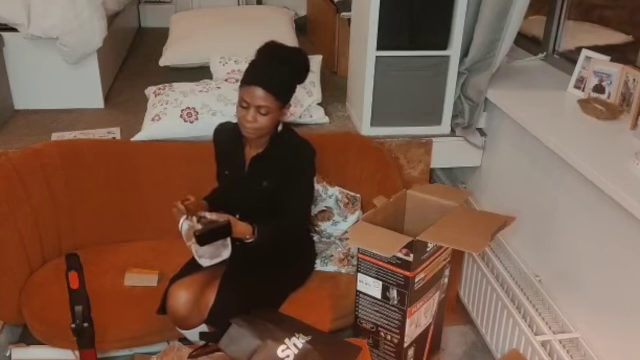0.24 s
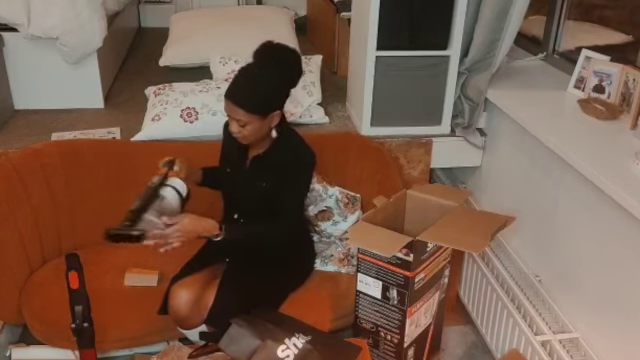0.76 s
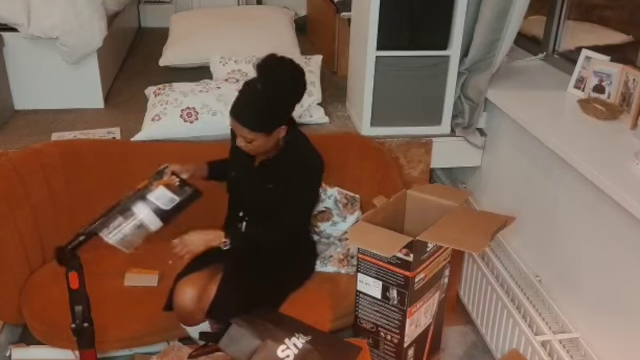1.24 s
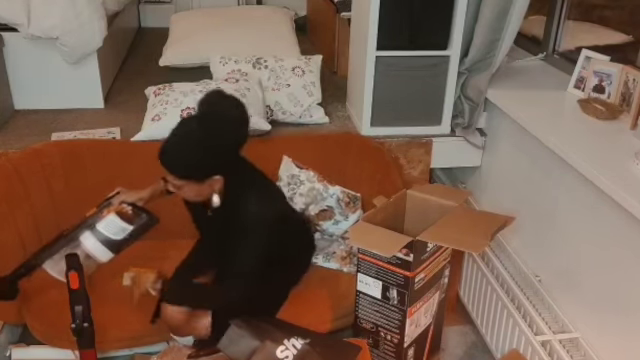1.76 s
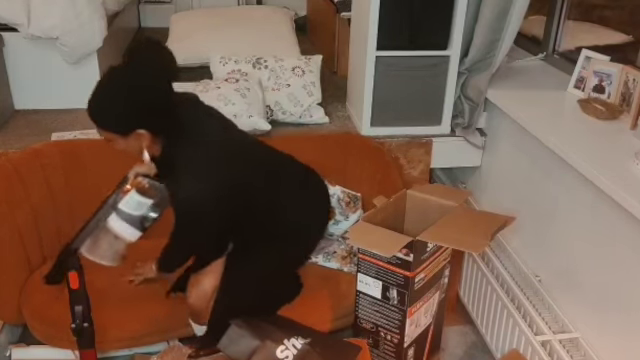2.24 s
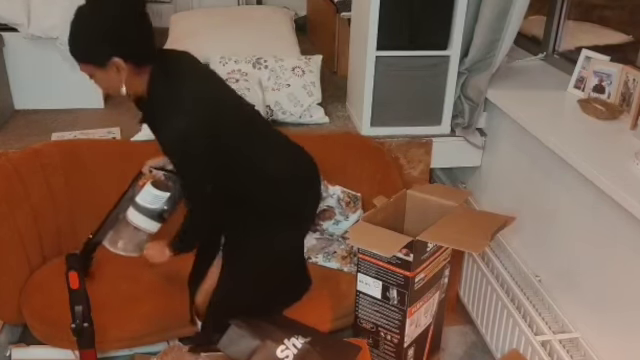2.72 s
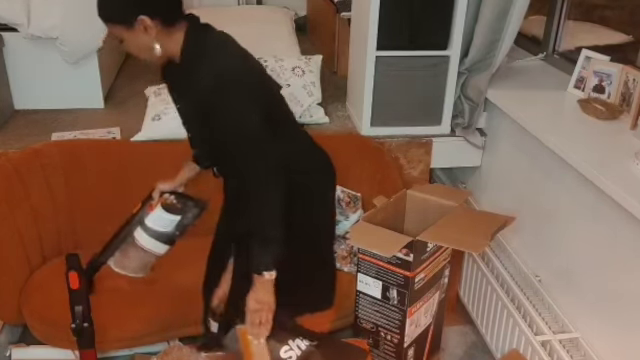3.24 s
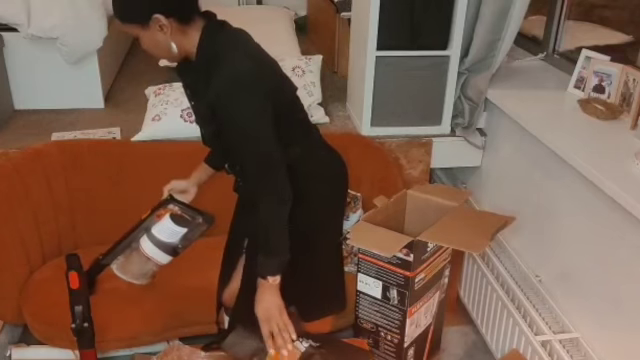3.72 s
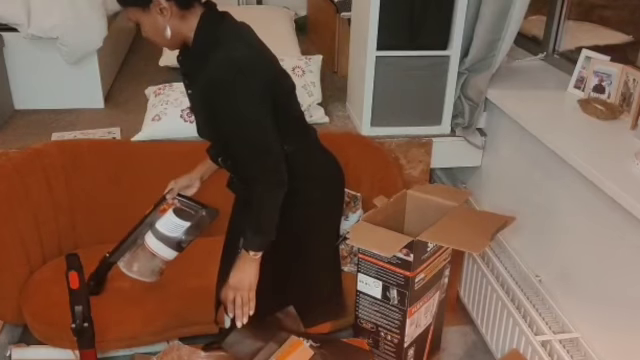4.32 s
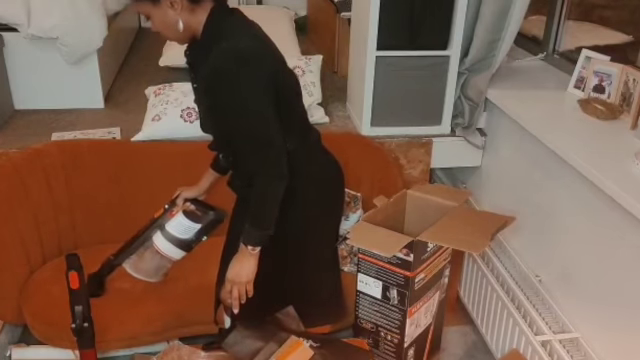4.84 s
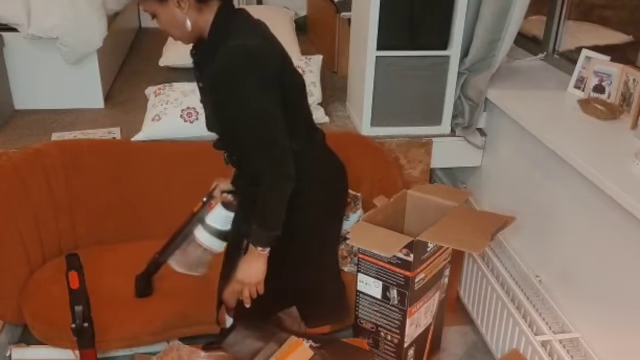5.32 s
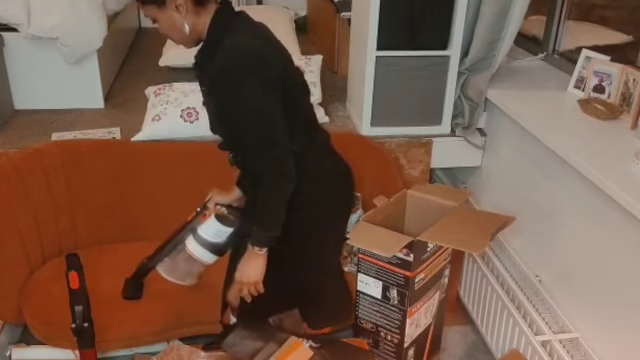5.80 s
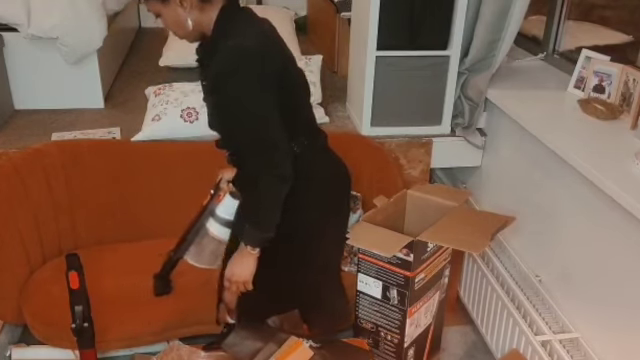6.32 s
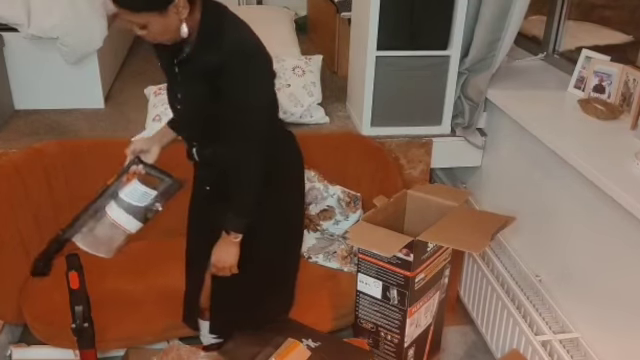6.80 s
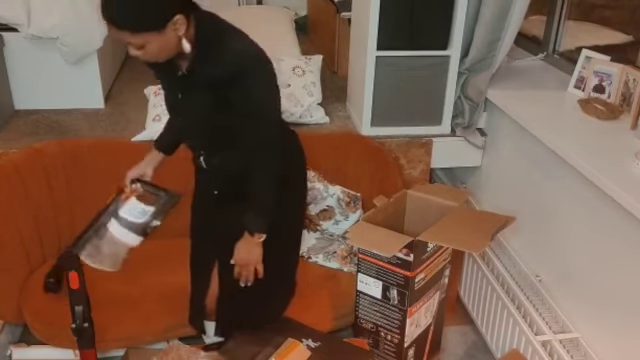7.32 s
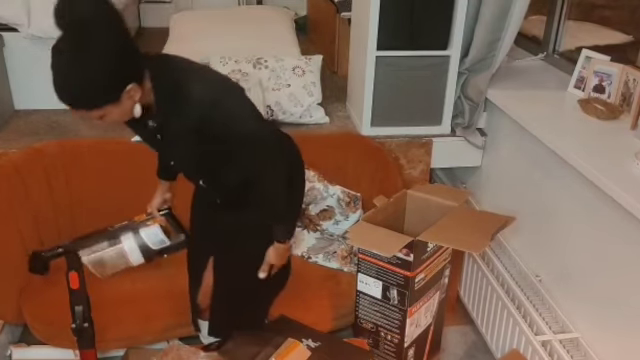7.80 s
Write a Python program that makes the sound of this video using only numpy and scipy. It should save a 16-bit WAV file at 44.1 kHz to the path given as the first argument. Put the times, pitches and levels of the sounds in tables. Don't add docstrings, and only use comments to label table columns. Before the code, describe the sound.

In a furnished room, a sharp plastic snap rings briefly, then near quiet with faint cloth movement. A sleeve swishes and a knee thumps the seat, followed by scattered small ticks and knocks. A trigger clicks and a small vacuum motor whines upward with rushing air, runs about a second, then jumps abruptly to a lower, falling whine that fades out. Stereo microphone, source to the right, soft hush.

```python
import sys
import numpy as np
from scipy import signal
from scipy.fft import rfft, irfft, next_fast_len
from scipy.io import wavfile
from scipy.ndimage import uniform_filter1d

SR = 44100
rng = np.random.default_rng(int(sys.argv[2]) if len(sys.argv) > 2 else 0)


def attenuation_scalar(level_db):
    decades = np.asarray(level_db, float) / 20
    return 10 ** decades


def transcribe(u):
    v = np.clip(np.atleast_2d(u).T, -1, 1)
    q = np.round(v * 32767).astype(np.int16)
    wavfile.write(sys.argv[1], SR, q)


N = 355269
SKIP_S = 6.56
BLADES = 11
FULL_SPEED_HZ = 1130

# pitch_hz, likeness
PORT_LIKENESS = [(60, 0.89), (150, 0.89), (380, 0.77), (940, 0.33), (2350, 0.07), (5880, -0.082),
                 (14700, 0.66)]
# pitch_hz, level_db
LEFT_MINUS_RIGHT = [(60, -7.0), (150, -8), (380, -8.0), (940, -8), (2350, -6), (5880, -10), (14700, -22.5)]
# pitch_hz, level_db (per Hz)
HUSH_COLOUR = [(12, -28), (20, 2), (48, -8.5), (177, -2.5), (416, -16.5), (563, -9), (1220, -15.5),
               (1360, -13.5), (6930, -22.5), (13400, -28), (14600, -34.5)]

# start_s, level_db
CLOTH_MOVEMENT = [
    [(.3, -76), (.45, -79.5), (1.21, -83), (1.68, -74.5), (2.14, -69.5), (2.26, -64), (2.37, -53),
     (2.41, -60.5), (2.48, -59), (2.55, -66), (2.84, -61.5), (3.01, -65.5), (3.37, -63.5), (3.52, -69.5),
     (3.9, -68.5), (4.72, -76.5)],
    [(7.4, -66), (8.06, -67.5)],
]
# pitch_hz, level_db (per Hz)
SHUFFLE_COLOUR = [(29, -60), (50, -50), (96, -3.5), (144, -5), (226, -9.5), (520, -10.5), (680, -49),
                  (1140, -120)]
# pitch_hz, level_db (per Hz)
RUB_COLOUR = [(280, -44), (480, -18.5), (654, -8.5), (1010, -7), (1940, -8), (2600, -13.5), (2800, -13),
              (3640, -44), (6160, -120)]
# pitch_hz, level_db (per Hz)
RUSTLE_COLOUR = [(1530, -37), (2600, -2), (3400, 0.5), (5310, -0.5), (6990, 1), (11800, -12.5),
                 (13800, -11.5), (14600, -9)]
# level_db (medium movement), share of movement
FABRIC_LAYERS = [
    (-66, .9),
    (-62, 1.3),
    (-59.5, 1.08),
]
# start_s (centre), level_db, half_length_s
WEIGHT_SHIFTS = [
    (.3, -74.5, 0.055),
    (1.679, -74.5, 0.078),
    (2.387, -54, .03),
    (2.847, -65, 0.058),
    (4.628, -76.5, 0.063),
    (7.546, -66.5, 0.088),
    (8.05, -72, 0.085),
]
# start_s (centre), bright_db, dull_db, half_length_s
SWISHES = [
    (0.593, -70, -90, .015),
    (.68, -66, -74.5, 0.029),
    (2.109, -72, -67, 0.028),
    (2.267, -54.5, -57, 0.034),
    (2.32, -48, -52, 0.019),
    (2.512, -57.5, -65.5, 0.043),
    (5.856, -35.5, -62, .01),
]
# pitch_hz, level_db (per Hz)
BRUSH_COLOUR = [(1760, -37), (3000, -6), (5120, -8.5), (5790, -5), (6300, -2), (8470, -8), (14000, -19)]

# start_s, level_db
KNEE_THUMPS = [
    (2.328, -26.5),
    (2.431, -39.5),
    (3.79, -66),
    (3.89, -73),
    (4.7, -64),
    (7.524, -65),
]
# pitch_hz, level_db, t60_s
SEAT_MODES = [(94.7, 0.5, 0.22), (128.6, -7.5, 0.39), (204.4, -5.5, 0.233), (327, -24, 0.26),
              (416, -20.5, 0.22)]

# start_s, crack_db, thud_db, body_db, tilt_db (brightness per band)
SMALL_TICKS = [(0.813, -58.5, -78, -67, -7.5), (0.971, -51, -72, -67, 5), (1.609, -57, -65, -68.5, 0.5),
               (2.69, -33.5, -71.5, -51.5, 4.5), (2.775, -39, -56, -53, -6.5), (3.228, -52, -68, -59, -2),
               (3.248, -34, -61, -55.5, 5.5), (3.456, -58, -64, -69, -7), (3.47, -38, -66, -73, -5),
               (3.49, -46, -70, -58.5, 1), (3.78, -30, -49.5, -50.5, 1), (3.865, -52, -67, -56.5, -1),
               (3.882, -38, -44.5, -41.5, -1.5), (4.31, -63, -63, -83, 3), (4.553, -40, -64.5, -53.5, 5.2),
               (7.524, -46, -47.5, -58.5, -5.5), (7.569, -32, -59, -63.5, -8),
               (7.781, -43, -77, -59.5, 1.5), (7.839, -46.5, -77, -69, 2.1)]
OPENING_SNAP = [
    (0.014, -9, -32, -22, -1.5),
]
EARLIER_TICK = (0.0, -63, -49, -41, -6.5)
# pitch_hz, level_db (per Hz)
SNAP_COLOUR = [(120, -39.5), (200, -10), (231, -9.5), (509, -14), (577, -1.5), (666, -26.5), (755, -11.5),
               (953, -19.5), (1440, -5.5), (1630, -9.5), (1820, -2.5), (3350, -6.5), (4080, -10),
               (5440, -2), (14600, -25.5)]
# pitch_hz, level_db (per Hz)
TICK_COLOUR = [(59, -47), (100, -17), (172, -3.5), (261, -12), (564, -9.5), (1810, -12), (4830, -10.5),
               (6210, -5), (14600, -14.5)]
# centre pitch_hz, room t60_s
TICK_BANDS = [(500, .42), (1900, 0.43), (5300, 0.38), (10500, .23)]
# start_s, pitch_hz, level_db, t60_s
PART_MODES = [(.018, 572, -34, .3), (.016, 1830, -21, 0.089), (.016, 2176, -22, 0.057),
              (.016, 5315, -25.5, 0.19), (.972, 8700, -59, .03), (1.611, 8600, -55, 0.027),
              (3.231, 950, -56, 0.16), (2.31, 995, -46, .1), (3.25, 2270, -51.5, 0.07),
              (3.457, 3100, -58, 0.062), (3.495, 2900, -57, .08), (.016, 1480, -30, .15),
              (.016, 3005, -28.5, .1), (2.2, 1500, -60, .15), (3.25, 4200, -51, .05),
              (3.492, 5850, -50, .05), (3.492, 7700, -53, .05), (3.505, 1340, -57.5, .12),
              (3.884, 3300, -39, 0.044), (3.886, 1833, -37.5, .06), (7.79, 2800, -62, 0.18)]

# pitch_hz, level_db (per Hz)
ROAR_COLOUR = [(35, -64), (60, -63), (160, -11), (258, -41), (322, -12.5), (454, -13), (576, -4.5),
               (741, -8.5), (1140, -3), (1840, -10), (2100, -9.5), (2730, -38), (4620, -120)]
# pitch_hz, level_db (per Hz)
HISS_COLOUR = [(1410, -12), (2400, -1.5), (2620, -2), (4490, -0.5), (4970, -0.5), (6030, 0), (6610, -1.5),
               (7600, -14.5), (9880, -68), (16700, -120)]
# pitch_hz, level_db (per Hz)
FIZZ_COLOUR = [(4350, -33), (7400, 6), (9000, 2), (10300, -3.5), (12800, -2), (13700, 0), (14400, -8),
               (14700, -20)]
# pitch_hz, width_hz, level_db
DUCT_MODES = [(950, 92, -19.5), (1136, 150, -25), (1492, 180, -15), (1651, 140, -15.5)]
# pitch_hz, width_hz, level_db
VENT_MODES = [(5950, 350, -19), (6650, 350, -21)]
# level_db (full speed), power of speed, share of the nozzle gap
FLOW_LAYERS = [
    (-32, 2.7, -.7),
    (-35, 2.6, .3),
    (-43.5, 2.6, 1.05),
    (-44, 1.9, -2.1),
]
FLOW_COAST_DB = [4.1, 1.56, -0.3, 3]
# start_s, level_db
NOZZLE_GAP = [
    [(4.6, 1), (5.3, -2), (5.53, 1.5), (5.78, 3.5), (5.865, 1.5), (5.91, -1.7), (6.01, -1.5), (6.36, -4.1),
     (6.41, -3), (6.558, -2)],
    [(6.562, 0.34), (7.7, 0.9)],
]

# start_s, pitch_hz
SHAFT_SPEED = [
    [(4.62, 258), (4.73, 358), (4.9, 650), (5.03, 808), (5.17, 930), (5.33, 1033), (5.5, 1089),
     (5.82, 1138), (6.02, 1126), (6.558, 1120)],
    [(6.562, 833), (6.69, 828), (6.75, 770), (6.9, 558), (7.014, 481), (7.2, 381), (7.4, 290), (7.7, 200)],
]
# pitch_hz, level_db
BLADE_COLOUR = [(2400, -94), (3100, -83), (4100, -72), (5900, -73), (6800, -80), (11000, -79), (11700, -57),
                (12500, -55)]
# pitch_hz, width_hz, level_db
HOUSING_MODES = [(384, 40, -31), (532, 140, -41.5), (700, 130, -38.5), (819, 34, -30), (961, 42, -32),
                 (1107, 43, -48), (1556, 103, -26), (1685, 190, -31.5), (1854, 230, -33), (2132, 40, -30),
                 (2226, 99, -33)]
# start_s (centre), level_db, half_length_s
PATH_NULLS = [
    (5.125, -9, 0.015),
    (5.301, 4.5, .04),
    (5.782, -23, 0.029),
    (6.037, -19, 0.033),
    (6.14, -4, 0.088),
    (6.34, -14.5, 0.033),
    (7.09, -10, 0.041),
]
TONE_COAST_DB = [-4.5, -4, 8.5]


def evened(x):
    return x / np.sqrt(np.mean(x ** 2) + 1e-20)


def read(points, hz):
    f, value = np.transpose(points)
    return np.interp(np.log(hz + 1), np.log(f + 1), value)


def curves(tables, silent):
    t = np.arange(N) / SR
    out = np.full((len(tables[0][0]) - 1, N), float(silent))
    for rows in tables:
        s, *columns = np.transpose(rows)
        inside = (t >= s[0] - .002) & (t < s[-1] + .002)
        out[:, inside] = [np.interp(t[inside], s, c) for c in columns]
    return out


def drift(hz):
    return evened(signal.lfilter(*signal.butter(2, hz, fs=SR), rng.standard_normal(N)))


def bump(s, half):
    return np.exp(-.5 * ((np.arange(N) / SR - s) / half) ** 2)


def ports(hz):
    lag_s = 4 / SR
    side = attenuation_scalar(read(LEFT_MINUS_RIGHT, hz) / 2)
    left = side * np.exp(-2j * np.pi * hz * lag_s)
    return np.array([left, 1 / side]) * 2 / (side + 1 / side)


def noise(colour_db, patchy_db, like=1.0):
    frames, hz = N // 128 + 5, np.fft.rfftfreq(512, 1 / SR)
    a, b, c, d, patches = rng.standard_normal((frames, 257, 5), dtype=np.float32).T
    patches = uniform_filter1d(patches, size=6, axis=0)
    patches = evened(uniform_filter1d(patches, size=16, axis=1))
    same = np.clip(like * read(PORT_LIKENESS, hz), 0, 1)[:, None]
    left = a + 1j * b
    right = same * left + np.sqrt(1 - same ** 2) * (c + 1j * d)
    z = np.array([left, right]) * ports(hz)[..., None]
    z = z * attenuation_scalar(colour_db(hz)[:, None] + patchy_db * patches)
    x = signal.istft(z, nperseg=512, noverlap=384)[1][:, :N]
    return x / np.sqrt(np.mean(x.mean(0) ** 2))


def shaped(points, patchy_db, like=0.94):
    return noise(lambda hz: read(points, hz), patchy_db, like)


def ring(x, hz, width_hz):
    b, a = signal.iirpeak(hz, hz / width_hz, fs=SR)
    y = signal.lfilter(b, a, signal.lfilter(b, a, x))
    return y / np.sqrt(np.mean(y.mean(0) ** 2))


def room(x, t60):
    t = np.arange(SR // 2) / SR
    tail = rng.standard_normal((2, len(t))) * attenuation_scalar(-60 * t / t60) * (t > .004)
    tail = signal.lfilter(*signal.butter(2, 9000, fs=SR), tail / np.linalg.norm(tail[0]))
    return signal.fftconvolve(x, tail, axes=1)[:, :N]


def hush():
    return attenuation_scalar(-72.5) * shaped(HUSH_COLOUR, 1.2, like=0.38)


def cloth():
    move_db = curves(CLOTH_MOVEMENT, silent=-140)[0] + 60
    shuffle_db, rub_db, rustle_db = (db + share * move_db for db, share in FABRIC_LAYERS)
    grains = attenuation_scalar(0.57 * drift(91))
    shifts = sum(attenuation_scalar(db) * bump(s, half) for s, db, half in WEIGHT_SHIFTS)
    shuffle = shaped(SHUFFLE_COLOUR, 1.5) * (attenuation_scalar(shuffle_db) + shifts)
    rub = attenuation_scalar(rub_db) * shaped(RUB_COLOUR, 1.1)
    rustle = attenuation_scalar(rustle_db) * shaped(RUSTLE_COLOUR, 1.0)
    return shuffle + grains * (rub + rustle)


def swishes():
    bright = sum(attenuation_scalar(bright_db) * bump(s, half) for s, bright_db, dull_db, half in SWISHES)
    dull = sum(attenuation_scalar(dull_db) * bump(s, half) for s, bright_db, dull_db, half in SWISHES)
    return bright * shaped(BRUSH_COLOUR, 2.7) + dull * shaped(RUB_COLOUR, 3.3)


def thumps():
    out, t = np.zeros(N + SR), np.arange(SR // 2) / SR
    body = np.zeros(len(t))
    for k, (hz, db, t60) in enumerate(SEAT_MODES):
        body += (-1) ** k * attenuation_scalar(db - 60 * t / t60) * np.sin(2 * np.pi * hz * t)
    blow = body * (1 - np.exp(-t / 0.0025))
    for s, db in KNEE_THUMPS:
        out[int(s * SR):][:len(t)] += attenuation_scalar(db) * blow
    return out[:N] * attenuation_scalar(np.array([[-5.2], [3.2]]))


def band_levels(table):
    return np.array([(s, crack_db, thud_db, db - tilt_db, db, db + tilt_db)
                     for s, crack_db, thud_db, db, tilt_db in table])


def decay(x, t60):
    return signal.lfilter([1], [1, -attenuation_scalar(-120 / (t60 * SR))], x)


def ticks(table, colour, crack_db, build_hz):
    rows, out = band_levels(table), np.zeros((2, N))
    starts = (rows[:, 0] * SR).astype(int)
    size = next_fast_len(N)
    hz, spectrum = np.fft.rfftfreq(size, 1 / SR), rfft(shaped(colour, 0.59), size)
    place = read([(f, k) for k, (f, t60) in enumerate(TICK_BANDS)], hz)
    crack_db = rows[:, 1] - rows[:, 2:].max(1) + crack_db
    for k, (centre_hz, t60) in enumerate(TICK_BANDS):
        weight = np.cos(np.pi / 2 * np.clip(place - k, -1, 1))
        band = irfft(spectrum * weight, size)[:, :N]
        blows, cracks = np.zeros((2, N))
        blows[starts] = attenuation_scalar(2 * rows[:, 2 + k])
        cracks[starts] = attenuation_scalar(2 * (rows[:, 2 + k] + crack_db + 1.2 * k))
        power = attenuation_scalar(-10.0) * decay(blows, t60) + attenuation_scalar(-10.5) * decay(blows, 0.037) + decay(cracks, 0.0066)
        rise = 1 / (1 + (build_hz / centre_hz) ** 0.54)
        power = signal.lfilter([rise], [1, rise - 1], power)
        out += np.sqrt(abs(power)) * band / band.mean(0).std()
    return out


def rings():
    out, t = np.zeros((2, N + SR)), np.arange(SR // 4) / SR
    for s, hz, db, t60 in PART_MODES:
        pair = np.exp(2j * np.pi * hz * t) + .6 * np.exp(2j * np.pi * hz * 1.045 * t)
        out[:, int(s * SR):][:, :len(t)] += attenuation_scalar(db - 60 * t / t60) * (ports(hz)[:, None] * pair).imag
    direct = out[:, :N]
    return direct + attenuation_scalar(-3.5) * room(direct, 0.31)


def spin():
    start_s, start_db, rise_s = 4.72, -25, .015
    speed = uniform_filter1d(curves(SHAFT_SPEED, silent=0)[0], size=200)
    soft_db = start_db / (1 + np.exp(np.clip((np.arange(N) / SR - start_s) / rise_s, -50, 50)))
    return speed, 20 * np.log10(speed / FULL_SPEED_HZ + 1e-4), soft_db


def flow_levels():
    speed, speed_db, soft_db = spin()
    off, gap_db = np.arange(N) > SKIP_S * SR, curves(NOZZLE_GAP, silent=0)[0]
    pace_db = speed_db + 0.073 * soft_db
    return [db + power * pace_db + share * gap_db + off * coast_db
            for (db, power, share), coast_db in zip(FLOW_LAYERS, FLOW_COAST_DB)]


def air():
    roar_db, hiss_db, fizz_db, whistle_db = flow_levels()
    gust_db = 0.27 * drift(27.5)
    roar = signal.lfilter(*signal.butter(3, 190, "high", fs=SR), shaped(ROAR_COLOUR, 1.37))
    roar = roar + sum(attenuation_scalar(db) * ring(roar, hz, width) for hz, width, db in DUCT_MODES)
    hiss = shaped(HISS_COLOUR, 1.0)
    hiss = hiss + sum(attenuation_scalar(db) * ring(hiss, hz, width) for hz, width, db in VENT_MODES)
    fizz = shaped(FIZZ_COLOUR, 1.1)
    whistle = ring(shaped(ROAR_COLOUR, 0.48), 574.6, width_hz=29)
    flow = attenuation_scalar(roar_db - 5.0) * roar + attenuation_scalar(hiss_db + 0.15) * hiss + attenuation_scalar(fizz_db + 0.86) * fizz
    return flow * attenuation_scalar(gust_db) + attenuation_scalar(whistle_db - 3.0) * whistle


def housing_db(hz):
    return 20 * np.log10(sum(attenuation_scalar(db) / (1 + (2 * (hz - f) / width) ** 2) ** 1.06
                             for f, width, db in HOUSING_MODES))


def tone_levels(speed, speed_db):
    nulls_db = sum(db * bump(s, half) for s, db, half in PATH_NULLS)
    gap_db = curves(NOZZLE_GAP, silent=0)[0]
    off = np.arange(N) > SKIP_S * SR
    shaft, second = [housing_db(k * speed) + 2.1 * speed_db + nulls_db for k in (1, 2)]
    shaft = shaft + 1.2 * gap_db
    second = second - 10 * np.log10(1 + (1500 / (2 * speed + 1)) ** 8)
    blade = read(BLADE_COLOUR, BLADES * speed) + 2.8 * gap_db - 60 * (speed < 200)
    return [level + off * db for level, db in zip((shaft, second, blade), TONE_COAST_DB)]


def motor():
    speed, speed_db, soft_db = spin()
    levels_db = tone_levels(speed, speed_db) + soft_db
    turns = np.cumsum(speed * (1 + 0.00024 * drift(28))) / SR
    tones = attenuation_scalar(levels_db[1] - 21) * ports(4 * speed) * np.exp(8j * np.pi * turns)
    tones += attenuation_scalar(levels_db[2] - 12) * ports(5 * speed) * (1 + drift(60)) * np.exp(10j * np.pi * turns)
    blur = .15 + 1.3 * (np.arange(N) > SKIP_S * SR)
    for order, db, waver, pace_hz in zip((1, 2, BLADES), levels_db, (.5, .27, blur), (22, 24, 150)):
        paths = 1 + waver * np.array([drift(pace_hz) + 1j * drift(pace_hz) for port in range(2)])
        tones += attenuation_scalar(db) * ports(order * speed) * paths * np.exp(2j * np.pi * order * turns)
    direct = tones.real
    before = np.arange(N) < SKIP_S * SR
    tail = before * room(direct * before, 0.41) + room(direct * ~before, 0.91)
    return attenuation_scalar(2.5) * direct + attenuation_scalar(-4) * tail


def scene():
    snap = ticks([EARLIER_TICK] + OPENING_SNAP, SNAP_COLOUR, crack_db=-19.5, build_hz=20050000.0)
    touches = ticks(SMALL_TICKS, TICK_COLOUR, crack_db=-15.5, build_hz=1e6)
    return cloth() + swishes() + thumps() + snap + touches + rings() + air() + motor()


def low_pass(x):
    return signal.sosfilt(signal.butter(12, 15300, fs=SR, output="sos"), x)


def record(dry):
    cut = signal.sosfilt(signal.butter(4, 88, "high", fs=SR, output="sos"), dry)
    edge = signal.firwin(511, 14320, window=("kaiser", 9), fs=SR)
    mix = signal.oaconvolve(cut + hush(), edge[None], "same")
    return low_pass(mix)


dry = scene()
out = record(dry)
transcribe(out)
```